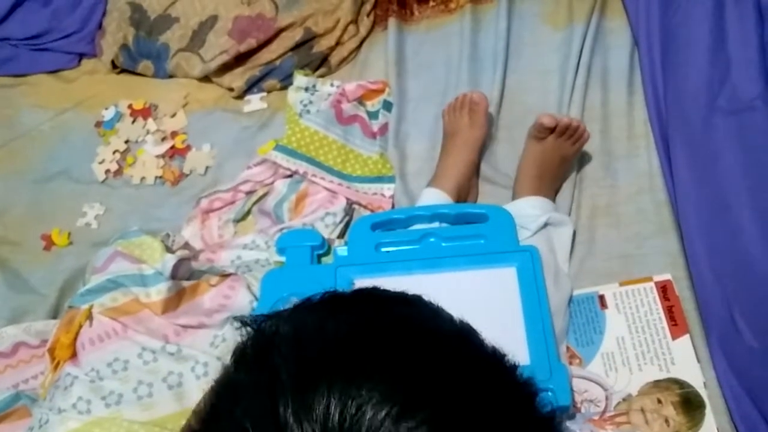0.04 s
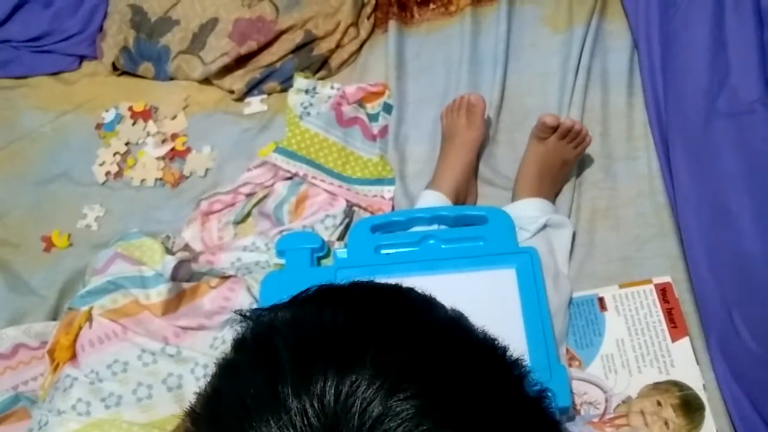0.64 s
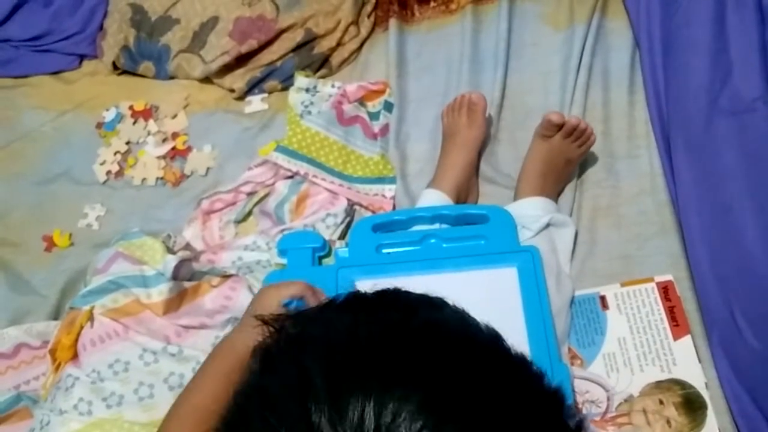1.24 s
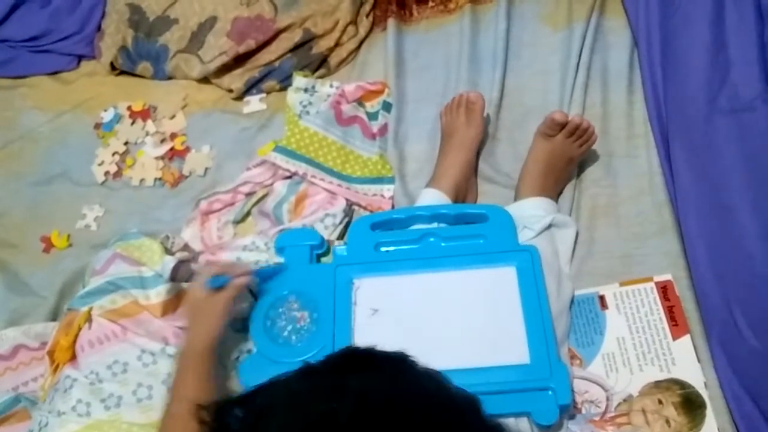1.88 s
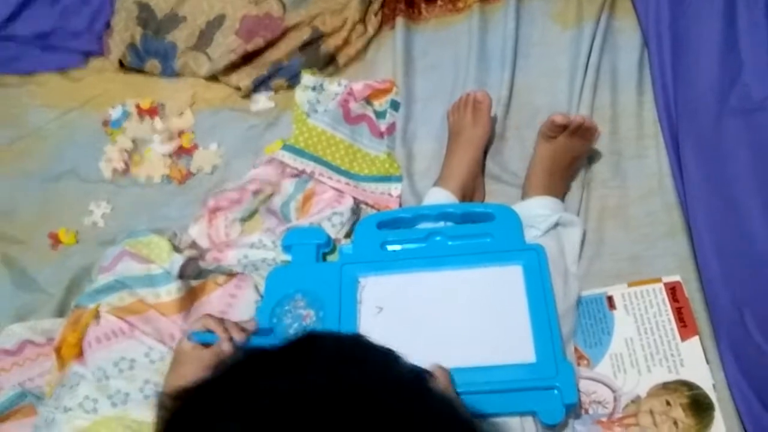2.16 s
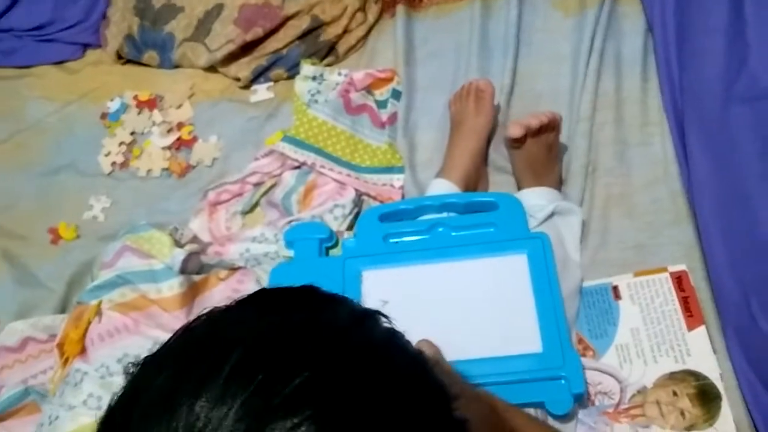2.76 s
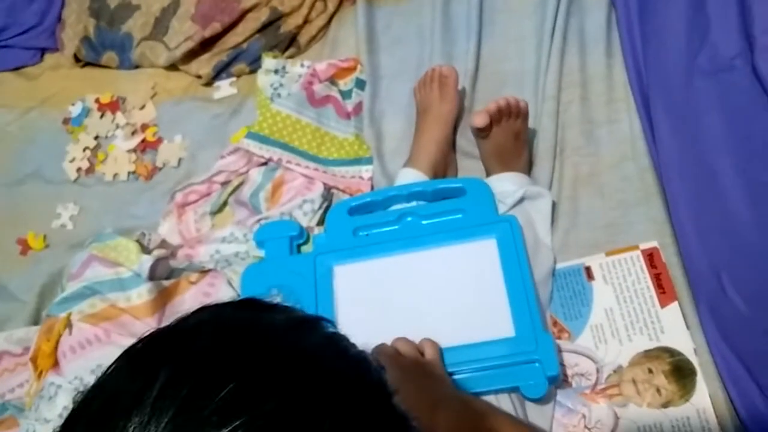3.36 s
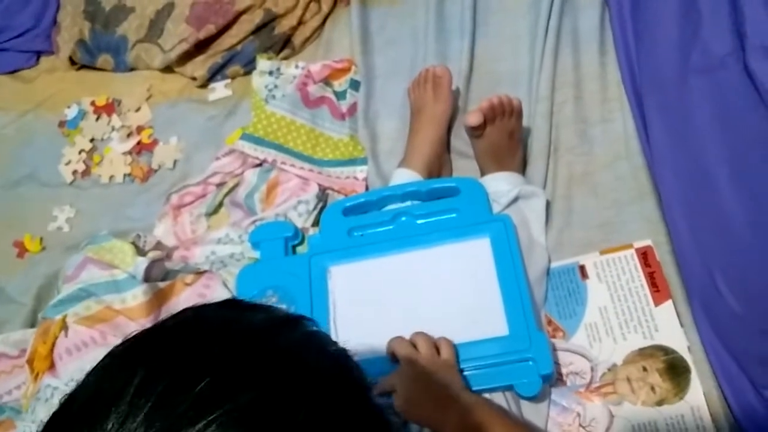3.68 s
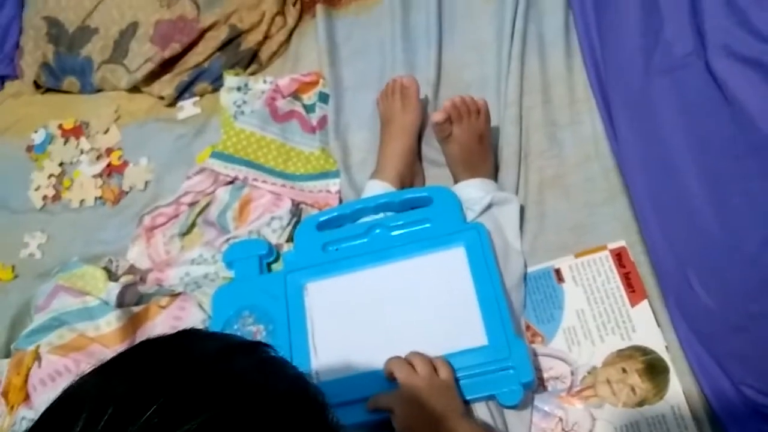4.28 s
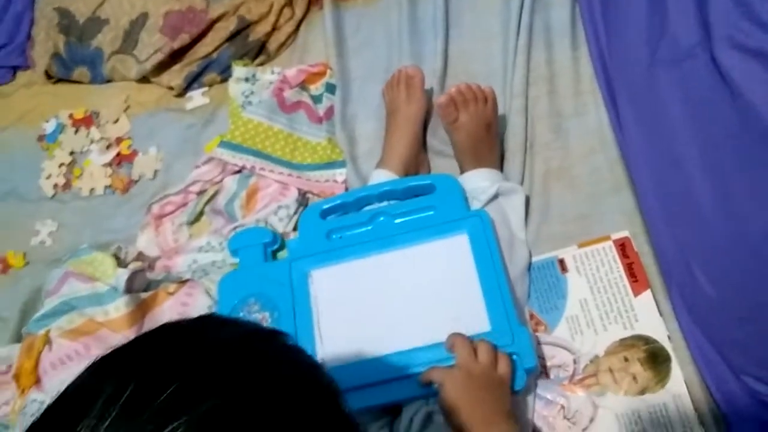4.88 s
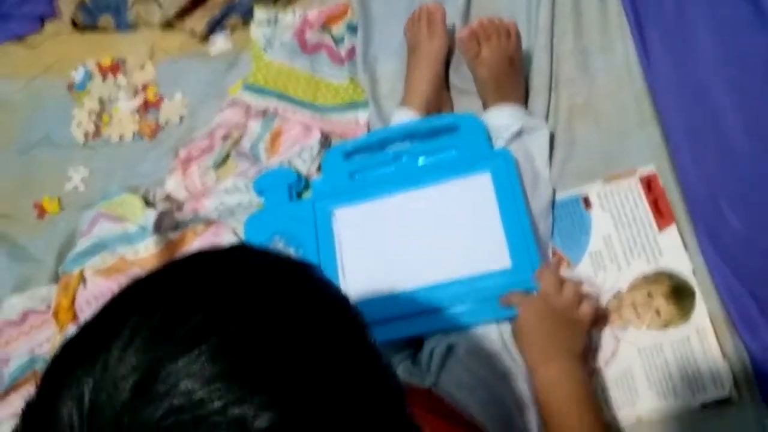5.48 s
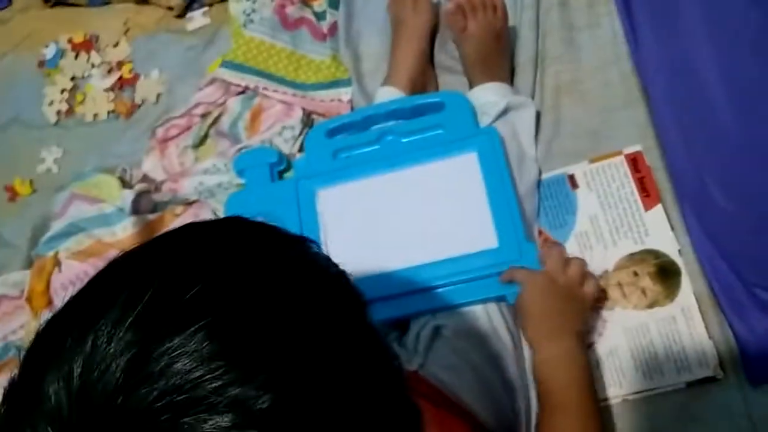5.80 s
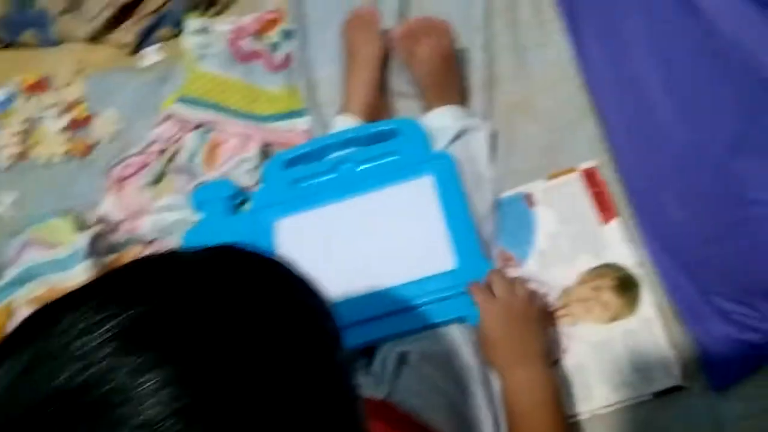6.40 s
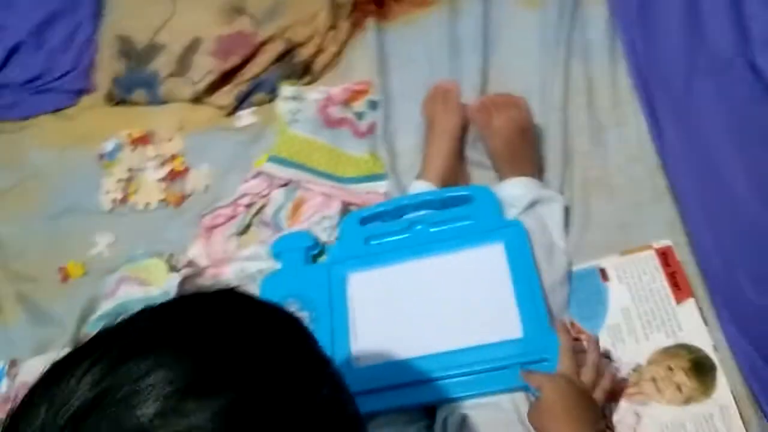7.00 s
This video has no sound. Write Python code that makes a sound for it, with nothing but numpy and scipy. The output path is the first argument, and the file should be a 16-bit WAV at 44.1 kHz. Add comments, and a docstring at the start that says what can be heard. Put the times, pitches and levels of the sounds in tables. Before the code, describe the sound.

A pen clicks and scrapes on a hollow plastic drawing board, over a fan's low, swelling hum in a small room.

```python
"""Drawing board on a bed

A child handles a plastic drawing board in a small room. The pen clicks and scrapes on the hollow
shell; the eraser slider rubs and knocks in its track; cloth ticks and the bedding thuds softly.
Thin, brief tones flicker faintly. A fan hums, its low drone swelling and sinking over air noise."""
import sys
import numpy as np
from scipy import signal
from scipy.fft import rfft, irfft
from scipy.io import wavfile
from scipy.ndimage import uniform_filter1d

SR = 44100
rng = np.random.default_rng(int(sys.argv[2]) if len(sys.argv) > 2 else 0)


def to_wav(sig):
    """Store sig (one row per channel, or 1-D mono) as 16-bit WAV at the path in sys.argv[1].

    Samples outside -1..1 are clipped; the rate is SR.
    """
    pcm = np.clip(np.atleast_2d(sig), -1, 1) * 32767
    pcm = np.round(pcm).astype(np.int16)
    wavfile.write(sys.argv[1], SR, pcm.T)  # frames by channels


N = 319708
TIME_S = np.arange(N) / SR

# Plastic impacts: (time [s], treble level [dB], mid [dB re treble], low [dB re treble],
# spot pitch [Hz], spot ring [dB re treble])
TAP_EVENTS = [(1.152, -78, 0, -8, 6840, 8.5), (1.414, -86.5, 13, -4, 2340, 18),
              (1.577, -56, -2.5, -8.5, 5230, 0), (1.821, -42.5, -6, -47, 6360, 2),
              (1.8407, -30.5, -7.5, -45, 3180, -9.5), (1.883, -39.5, -0.5, -26.5, 2960, -4),
              (1.8969, -30, -7.5, -26, 1386, -14), (1.972, -37.5, -15, -27, 2410, -5.5),
              (2.0135, -54.5, -18, -11, 4400, 3.5), (2.0836, -37.5, -11, -31.5, 3210, -4.5),
              (2.4118, -49, -25, -32.5, 4200, -5), (2.4951, -47, -11, -9.5, 2470, 3),
              (2.5037, -33, -6.5, -17, 2660, -4), (2.746, -53.5, -25, -33.5, 4170, -15),
              (2.771, -54.5, -21, -13, 5310, -2.5), (3.5852, -54, 2, -4, 472, 2.5),
              (3.593, -45, -2.5, -13, 4130, -6), (3.603, -54, -13.5, -35.5, 2720, -1),
              (3.854, -39, -16, -39, 2915, -15.5), (5.4881, -43, -5, -41, 8100, -9),
              (5.8735, -41.5, -5, -27.5, 1440, -5), (6.786, -47.5, -16.5, -32, 4620, -7.5)]
# Sliding contacts: (start [s], peak [s], end [s], treble level [dB], mid [dB re treble],
# spot pitch [Hz], spot ring [dB re treble])
SCRAPE_STROKES = [(0.962, 0.987, 1.135, -77.5, 4, 1443, 21), (1.41, 1.418, 1.53, -83.5, 14, 4620, 14),
                  (1.805, 1.846, 1.848, -37.5, -19, 5160, 6), (2.398, 2.454, 2.47, -54, -20, 3100, -12),
                  (2.741, 2.756, 2.79, -64.5, -16, 8640, 7.5), (3.079, 3.091, 3.13, -74, -7, 5100, 5),
                  (3.543, 3.6, 3.62, -61, -3, 2770, -5), (4.577, 4.599, 4.69, -57, -8.5, 1485, -0.5),
                  (4.587, 4.664, 4.696, -50, -27, 1460, -4.5), (5.067, 5.106, 5.19, -61, -15, 7660, 1.5),
                  (5.398, 5.511, 5.61, -53.5, -9.5, 7960, -9), (5.831, 5.861, 5.93, -57.5, -11, 1500, -14),
                  (6.77, 6.785, 6.88, -54, -17, 1470, -16.5)]
# Softness of a sliding contact: (frequency [Hz], gain [dB])
SLIDE_EQ = [(1000, 1.5), (2200, 3), (3200, -4.5), (4300, 2), (6000, -2.5), (8300, 0.5), (11000, 0),
            (15000, -5.5)]
# Hollow shell, broad response: (frequency [Hz], gain [dB])
SHELL_EQ = [(300, -26.5), (480, -4), (730, 1), (1020, -18.5), (1300, -6.5), (1600, -3.5), (1850, -11),
            (2300, 1), (3000, -7), (5300, 0), (7000, -0.5), (8400, 0.5), (10500, -10.5), (15000, -30)]
# Hollow shell, sharp modes: (frequency [Hz], width [Hz], gain [dB])
SHELL_RESONANCES = [(737, 57, -1), (1146, 35, -3), (1420, 170, -4.5), (1540, 23, -9), (1556, 10, -2.5),
                    (2200, 24, 6), (2530, 35, -14), (2936, 19, 9.5), (2850, 16, -5.5), (3550, 12, -4.5),
                    (3850, 12, 2), (4600, 25, 0), (4890, 45, -3.5), (5160, 12, -21.5), (5350, 6.2, -1),
                    (5870, 31.4, -5.5), (6560, 23, -6.5), (6700, 8.29, -0.5), (7600, 34.7, -3.5),
                    (7390, 30, -1.5), (7700, 30, 7), (8080, 63, 4), (8240, 35, -2), (9160, 37, -3.5)]
# Bedding thuds: (start [s], length [s], level [dB])
THUD_EVENTS = [(0, 0.43, -59), (1.552, 0.099, -49), (1.63, 0.22, -59.5), (2.05, 0.25, -62.5),
               (2.58, 0.12, -60), (5.99, 0.12, -57.5), (6.075, 0.027, -48)]
# Mattress transmission: (frequency [Hz], gain [dB])
MATTRESS_EQ = [(25, -23.5), (45, -6.5), (66, 3.5), (85, 0.5), (110, -1.5), (170, -17.5), (300, -37.5),
               (900, -82)]
# Thin, brief tones at set times: (start [s], length [s], pitch [Hz], level [dB])
THIN_TONE_EVENTS = [(0.03, 0.062, 5140, -73.5), (0.054, 0.025, 9060, -66), (0.757, 0.058, 2510, -68),
                    (1.093, 0.049, 8280, -73), (1.12, 0.033, 740, -60), (1.45, 0.11, 8080, -65.5),
                    (1.619, 0.11, 641, -65), (1.902, 0.065, 735, -53.5), (2.917, 0.029, 2270, -68),
                    (3.079, 0.067, 8100, -74.5), (3.366, 0.089, 2850, -71.5), (3.957, 0.11, 3592, -66),
                    (4.262, 0.052, 9000, -74), (4.423, 0.063, 2220, -68.5), (4.469, 0.054, 4805, -67),
                    (4.9, 0.1, 3665, -74.5), (5.162, 0.062, 3590, -69), (5.251, 0.083, 3683, -68.5),
                    (5.733, 0.085, 2920, -67.5), (5.813, 0.14, 2924, -62.5), (6.404, 0.047, 2360, -72.5),
                    (6.546, 0.074, 877, -63), (6.73, 0.068, 744, -65.5), (6.939, 0.38, 3700, -74),
                    (7.035, 0.21, 2970, -74)]
# Fan drone partials: (frequency [Hz], relative level [dB])
DRONE_TONES = [(242.4, -4.5), (304.8, -16.5), (358, -32), (155, -21.5)]
# Turbulence around the drone: (frequency [Hz], gain [dB])
TURBULENCE_EQ = [(50, -51.5), (120, -33), (165, -2), (200, -14.5), (240, 11.5), (275, -2.5), (310, 4.5),
                 (360, -11), (430, -32), (1000, -68.5)]
# Drone swells: (start [s], length [s], relative level [dB])
DRONE_SWELLS = [(0.0, 0.018, -34.5), (0.159, 0.021, -50.5), (0.294, 0.23, -43.5), (0.787, 0.17, -48),
                (1.195, 0.043, -50.5), (1.235, 0.099, -49.5), (1.387, 0.11, -51.3), (1.824, 0.31, -46.5),
                (2.298, 0.053, -44.5), (2.368, 0.089, -54.5), (2.724, 0.062, -48.5), (2.79, 0.035, -52),
                (2.86, 0.022, -51), (3.117, 0.2, -46.5), (3.335, 0.12, -49.5), (3.509, 0.024, -49.5),
                (3.571, 0.14, -52), (3.806, 0.03, -47), (4.106, 0.02, -50.5), (4.423, 0.039, -50.9),
                (4.531, 0.057, -46), (4.633, 0.072, -45), (5.1, 0.15, -44.5), (5.371, 0.096, -49.5),
                (5.442, 0.307, -51), (5.731, 0.058, -49.0), (5.94, 0.21, -48), (6.351, 0.125, -44.5),
                (6.603, 0.044, -54), (6.795, 0.036, -53.5), (6.83, 0.14, -49)]
# Motor hum: (frequency [Hz], level [dB])
MOTOR_TONES = [(119.5, -75), (155.5, -72.5), (241, -84.5), (310, -77.5), (363, -81), (538, -85),
               (743, -81.5)]
# Room air spectrum: (frequency [Hz], gain [dB])
AIR_EQ = [(25, -18.5), (80, -7), (140, 2), (200, -5.5), (320, -5.5), (450, -11.5), (700, -7), (950, -13.5),
          (1900, -20.5), (2800, -21.5), (4200, -29.5), (6500, -35.5), (8600, -29.5), (12000, -45.5)]
# Flickering air bands: (centre [Hz], resonator width [Hz], level [dB])
AIR_FLICKER_BANDS = [(678, 110, -78), (1169.4, 88, -76), (1708, 79, -84.5), (2470, 220, -89),
                     (2830, 190, -82), (3630, 120, -87), (8870, 300, -91)]


def taps(snap_s=0.002, chatter_s=0.016, low_chatter_s=0.023, spot_s=0.019, rise_s=0.000946,
         snap_even_db=-49, snap_db_per_db=0.9):
    """Plastic on plastic: snap, chatter and a ring of the struck spot. Harder taps snap more."""
    forces, spots = np.zeros((3, N)), np.zeros(N)
    t = TIME_S[:SR // 6]
    attack = 1 - np.exp(-t / rise_s)
    decay = np.exp(-t / chatter_s)
    onset = SR // 70  # levels apply to the first 14 ms
    for time_s, db, mid_db, low_db, spot_hz, spot_db in TAP_EVENTS:
        i = int(time_s * SR)
        snap = undb(snap_db_per_db * (db - snap_even_db)) * np.exp(-t / snap_s)
        chatter = noise(len(t))
        treble = chatter * (snap + decay)
        mid = chatter * (snap / 2 + decay)
        low = chatter * np.exp(-t / low_chatter_s)
        spot = ring(spot_hz, len(t), width_ratio=0.19) * np.exp(-t / spot_s)
        blows = attack * np.array([treble, mid, low, spot])
        for track, blow, part_db in zip([*forces, spots], blows, (0, mid_db, low_db, spot_db)):
            track[i:i + len(t)] += undb(db + part_db) * blow / np.std(blow[:onset])
    return radiate(forces) + spots


def scrapes(slips_per_s=1500, low_re_mid_db=-18):
    """Stick-slip: dense tiny clicks ring the shell; the spot under the contact rings too."""
    grip = undb(1.8 * drift(55))
    slips = unit_rms((rng.random(N) < slips_per_s / SR) * np.sign(noise()))
    forces, spots = np.zeros((3, N)), np.zeros(N)
    for start_s, peak_s, end_s, db, mid_db, spot_hz, spot_db in SCRAPE_STROKES:
        push = undb(db) * np.interp(TIME_S, [start_s, peak_s, end_s], [0, 1, 0]) * grip
        on = np.flatnonzero(push)
        forces[:, on] += np.outer(undb([0, mid_db, mid_db + low_re_mid_db]), push[on])
        spot = ring(spot_hz, SR // 2, width_ratio=0.12)[:len(on)]
        spots[on] += undb(spot_db) * push[on] * unit_rms(spot)
    return colour(radiate(forces * slips), SLIDE_EQ) + spots


def shell(force):
    """Contact force rings the hollow shell: a broad response with a few prominent modes."""
    modes = sum(undb(db) * resonate(force, hz, width_hz) for hz, width_hz, db in SHELL_RESONANCES)
    return colour(force + modes, SHELL_EQ)


def radiate(forces):
    """Treble, mid and low forces through the shell, each band at unit power gain."""
    bands_hz = [(3600, 16000), (1000, 3600), (350, 1000)]
    impulse_response = shell(np.r_[1., np.zeros(SR // 10)])
    return sum(band(shell(force), *edges_hz) / np.linalg.norm(band(impulse_response, *edges_hz))
               for force, edges_hz in zip(forces, bands_hz))


def thuds():
    """Board and legs shift on the mattress, which passes only bass."""
    push = arches(THUD_EVENTS, skew=0.8, sharpness=1.2, release_s=0.02)
    return push * hold_level(colour(noise(), MATTRESS_EQ), span_s=0.029)


def rustle(ticks_per_s=24, base_db=-80, scatter_db=3, lo_hz=1500, hi_hz=10500, fall_db_per_oct=4,
           rise_s=0.002, decay_s=0.017):
    """Cloth and fingers stir: faint random ticks, weaker at higher pitch."""
    out = np.zeros(N + SR)
    t = TIME_S[:SR // 12]
    envelope = 2 * np.exp(-t / decay_s) * (1 - np.exp(-t / rise_s))
    for when, pitch, softness in rng.random((int(ticks_per_s * N / SR), 3)):
        i = int(when * N)
        hz = lo_hz * (hi_hz / lo_hz) ** pitch
        db = base_db - scatter_db * np.log(max(softness, 0.05)) - fall_db_per_oct * np.log2(hz / lo_hz)
        out[i:i + len(t)] += undb(db) * envelope * ring(hz, len(t), width_ratio=0.07)
    return out[:N]


def thin_tones(flickers_per_s=1.2, flicker_s=0.046, centre_hz=2516, spread_oct=0.253, flicker_db=-70.5):
    """Faint, thin, brief tones: some at set times, others flickering at random."""
    out = np.zeros(N + SR)
    flickers = [(when * N / SR, flicker_s, centre_hz * 2 ** (spread_oct * (2 * pitch - 1)), flicker_db)
                for when, pitch in rng.random((int(flickers_per_s * N / SR), 2))]
    for start_s, length_s, hz, db in THIN_TONE_EVENTS + flickers:
        i, size = int(start_s * SR), int(length_s * SR)
        envelope = np.interp(np.arange(size) / size, [0, 0.14, 1], [0, 1.4, 0])
        out[i:i + size] += undb(db) * envelope * ring(hz, size, width_ratio=0.026)
    return out[:N]


def fan(turbulence_db=-3, swell_gain_db=0.5, idle_db=-74, flutter_db=5, flutter_per_s=24):
    """Motor hum plus a rough drone near the fourth mains harmonic; it flutters low between swells."""
    eddies = undb(turbulence_db) * unit_rms(colour(noise(), TURBULENCE_EQ))
    partials = unit_rms(tones(DRONE_TONES, waver_hz=2))
    drone = hold_level(partials + eddies, span_s=0.07)
    motor = tones(MOTOR_TONES, waver_hz=1.12) * undb(0.5 * drift(3.5))
    idle = undb(idle_db + flutter_db * drift(flutter_per_s))
    swell = undb(swell_gain_db) * arches(DRONE_SWELLS, skew=0.68, sharpness=2.66, release_s=0.027)
    return np.hypot(idle, swell) * drone + motor


def air(floor_db=-69, flicker_db=5.5, drift_db=2):
    """Soft air noise; narrow bands drift and flicker independently."""
    bands = np.zeros(N)
    for hz, width_hz, db in AIR_FLICKER_BANDS:
        wander = undb(flicker_db * drift(20) + drift_db * drift(2.99))
        bands += undb(db) * unit_rms(wander * ring(hz, N, width_ratio=width_hz / hz))
    return undb(floor_db) * unit_rms(colour(noise(), AIR_EQ)) + bands


def room(x, wet_db=-7, body_t60_s=0.29, treble_t60_s=0.28, build_s=0.00074):
    """Walls add a short diffuse tail, slightly shorter in the treble."""
    t = TIME_S[:SR // 2]
    body = band(noise(len(t)), 290, 5000) * undb(-60 * t / body_t60_s)
    treble = band(noise(len(t)), 5000, 16000) * undb(-60 * t / treble_t60_s)
    tail = unit_rms((body + treble) * (1 - np.exp(-t / build_s))) / np.sqrt(len(t))
    return x + undb(wet_db) * signal.fftconvolve(x, tail)[:N]


def arches(rows, skew, sharpness, release_s):
    """Envelope: one arch per row, then exponential release. Skew < 1 peaks early."""
    out = np.zeros(N)
    for start_s, length_s, db in rows:
        on = (TIME_S > start_s) & (TIME_S < start_s + length_s)
        progress = np.clip((TIME_S[on] - start_s) / length_s, 0, 1) ** skew
        out[on] += undb(db) * (4 * progress * (1 - progress)) ** sharpness
    pole = np.exp(-1 / (release_s * SR))
    return signal.lfilter([1 - pole], [1, -pole], out + 1e-18)


def tones(rows, waver_hz):
    """Sines with slight pitch waver."""
    return sum(undb(db) * np.sqrt(2) * np.sin(2 * np.pi * np.cumsum(hz + waver_hz * drift(9)) / SR)
               for hz, db in rows)


def ring(hz, size, width_ratio):
    """Noise through the same resonator twice, rms 1."""
    width_hz = hz * width_ratio
    once = resonate(noise(size + SR // 10), hz, width_hz)
    return unit_rms(resonate(once, hz, width_hz)[-size:])


def resonate(x, hz, width_hz):
    """One resonance, unit gain at centre."""
    return signal.lfilter(*signal.iirpeak(hz, hz / width_hz, fs=SR), x)


def colour(x, points, fft_size=2048):
    """Minimum-phase filter from (frequency [Hz], gain [dB]) points."""
    hz, db = np.transpose(points)
    bins_hz = np.arange(fft_size // 2 + 1) * SR / fft_size
    gain = undb(np.interp(np.log(bins_hz + 1), np.log(hz), db))
    cepstrum = irfft(np.log(gain))[:fft_size // 2]
    cepstrum[0] /= 2
    impulse_response = irfft(np.exp(rfft(2 * cepstrum, fft_size)))
    return signal.fftconvolve(x, impulse_response)[:len(x)]


def band(x, lo_hz, hi_hz):
    """Steep band-pass."""
    return signal.sosfilt(signal.butter(4, [lo_hz, hi_hz], "band", fs=SR, output="sos"), x)


def drift(steps_per_s):
    """Smooth random drift, rms 1."""
    hold = int(SR / steps_per_s)
    steps = np.repeat(noise(N // hold + 1), hold)
    return unit_rms(uniform_filter1d(steps, hold)[:N])


def hold_level(x, span_s):
    """Divide by the running rms."""
    return x / np.sqrt(uniform_filter1d(x ** 2, int(span_s * SR)) + 1e-12)


def noise(size=N):
    """White noise."""
    return rng.standard_normal(size)


def unit_rms(x):
    """Scale to rms 1."""
    return x / np.sqrt(np.mean(x ** 2) + 1e-20)


def undb(db):
    """Decibels to gain."""
    return 10 ** (np.asarray(db) / 20)


def scene():
    """Board, thin tones and rustle in the room, over thuds, fan and air. Mono."""
    direct = taps() + scrapes() + thin_tones() + rustle()
    return (room(direct) + thuds() + fan() + air())[None]


def record(dry):
    """Steep low-pass."""
    cutoff_hz = 15700
    return signal.sosfilt(signal.ellip(8, 0.2, 70, cutoff_hz, fs=SR, output="sos"), dry)


dry = scene()
out = record(dry)
to_wav(out)
```